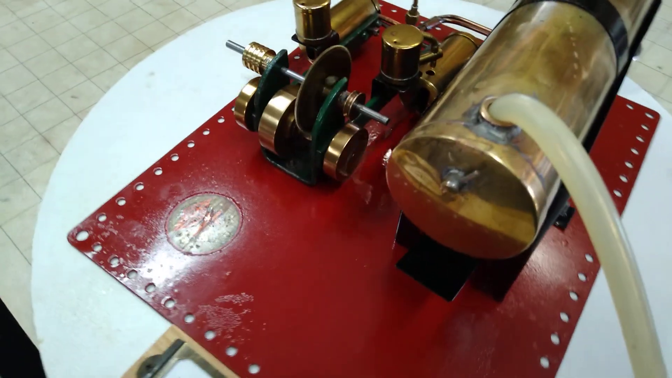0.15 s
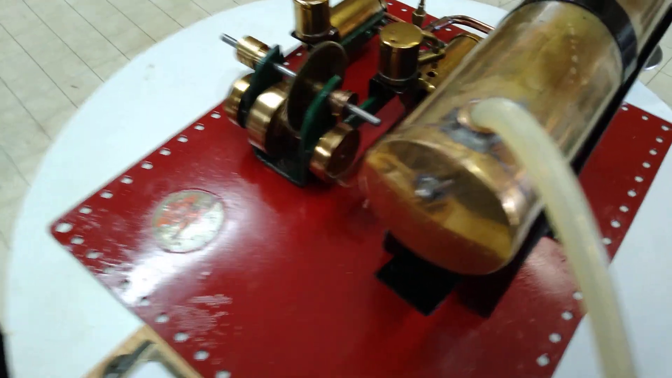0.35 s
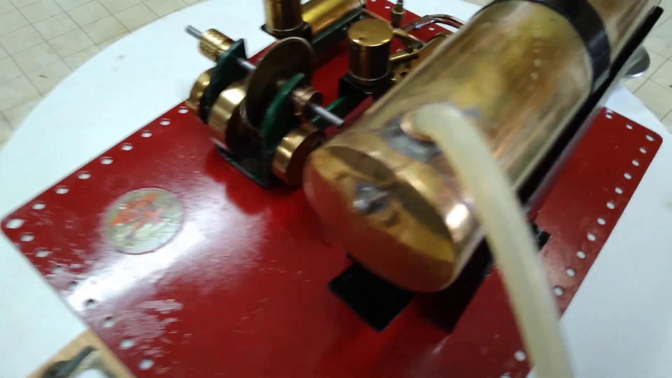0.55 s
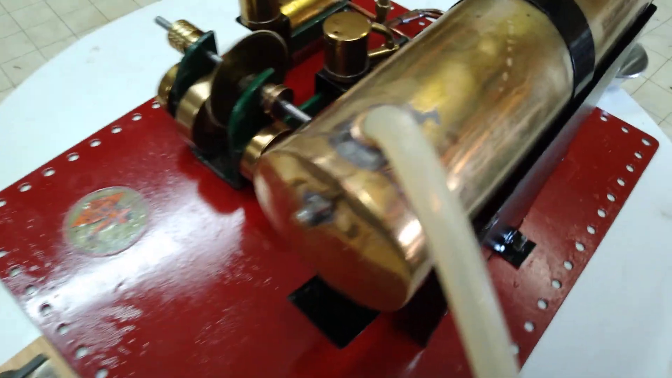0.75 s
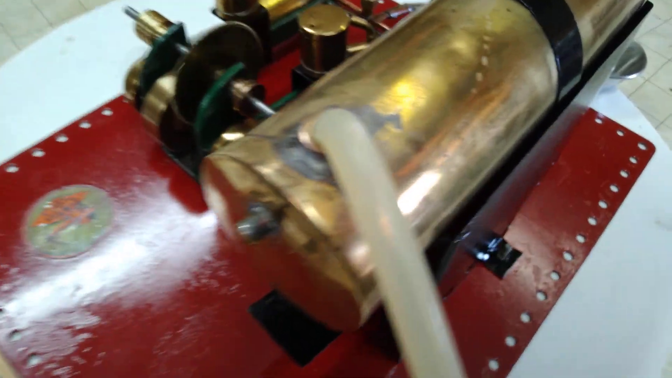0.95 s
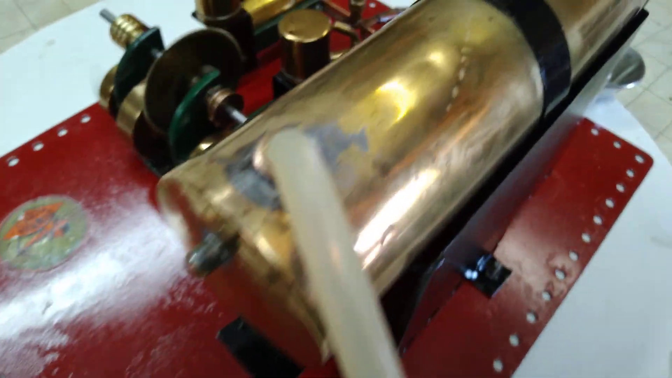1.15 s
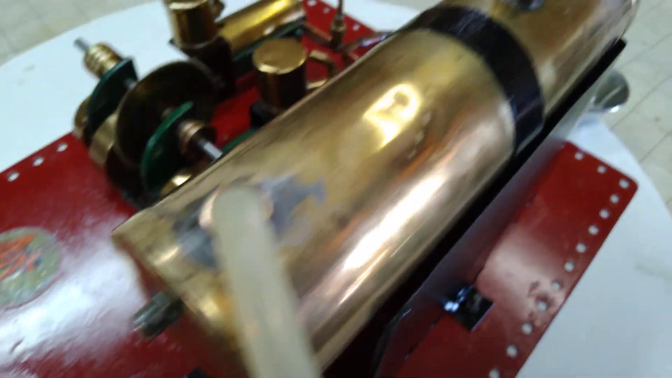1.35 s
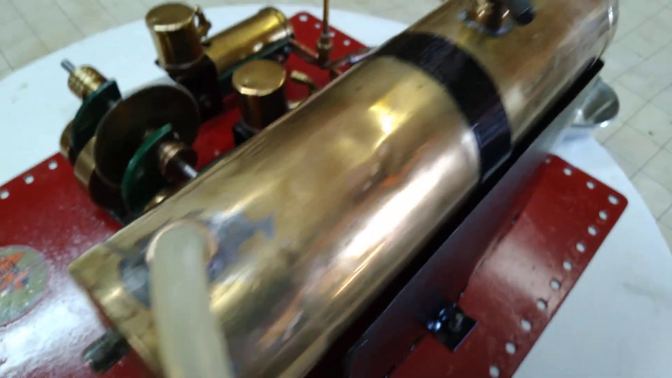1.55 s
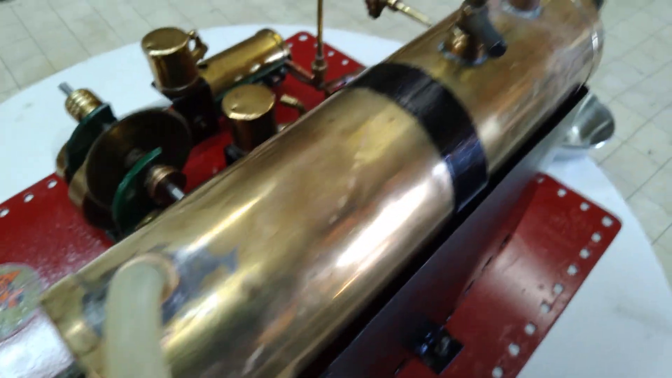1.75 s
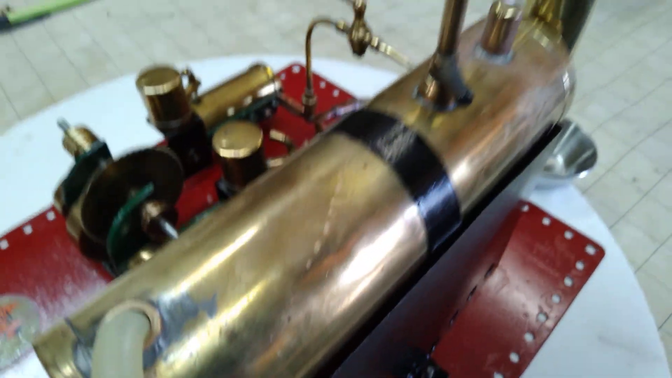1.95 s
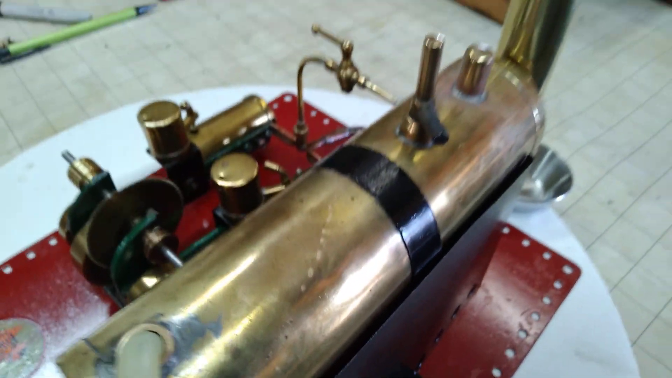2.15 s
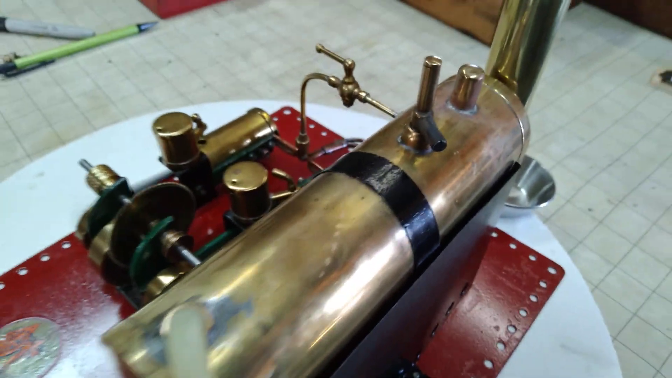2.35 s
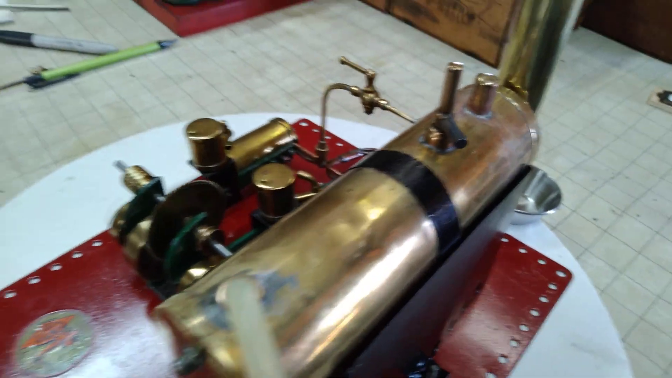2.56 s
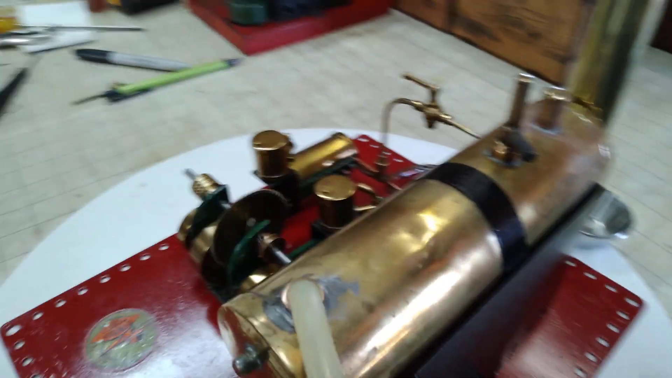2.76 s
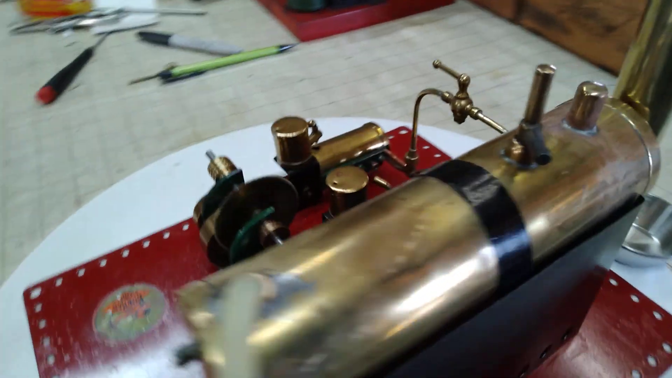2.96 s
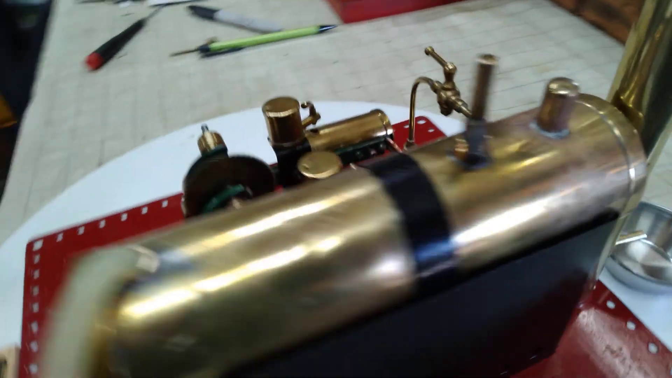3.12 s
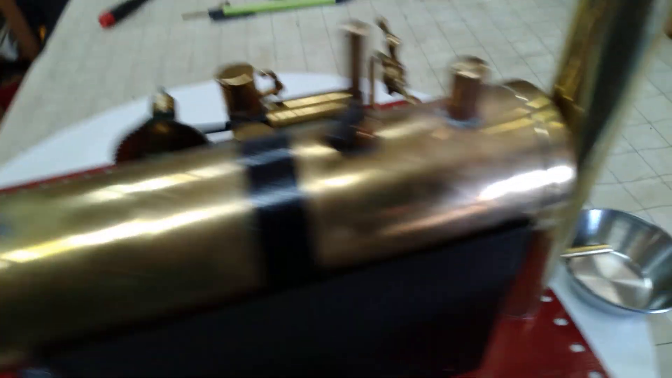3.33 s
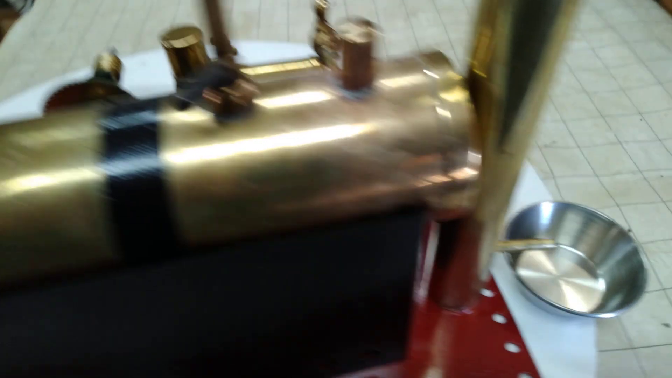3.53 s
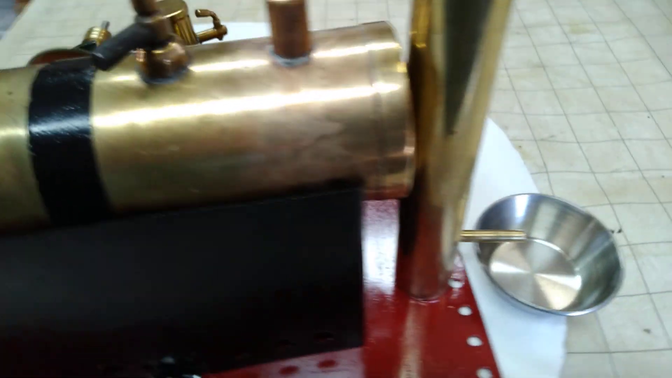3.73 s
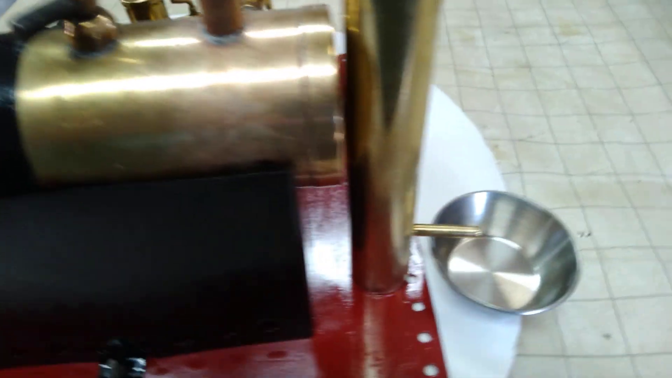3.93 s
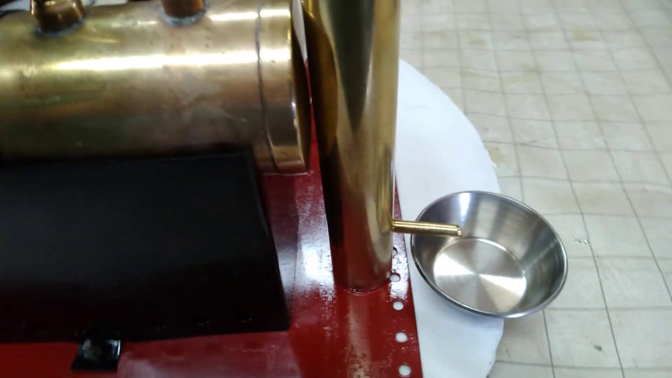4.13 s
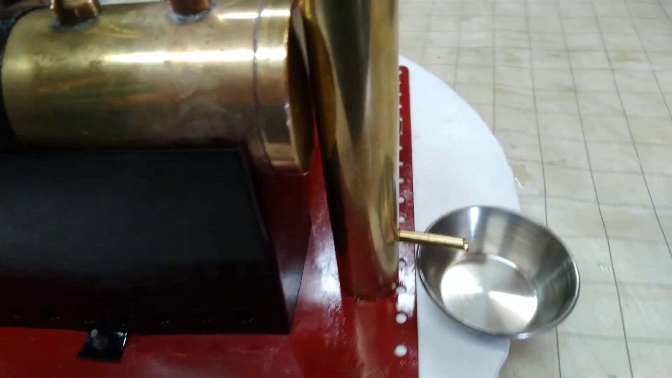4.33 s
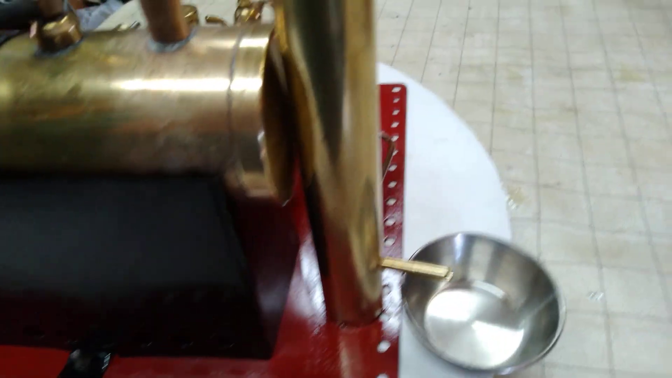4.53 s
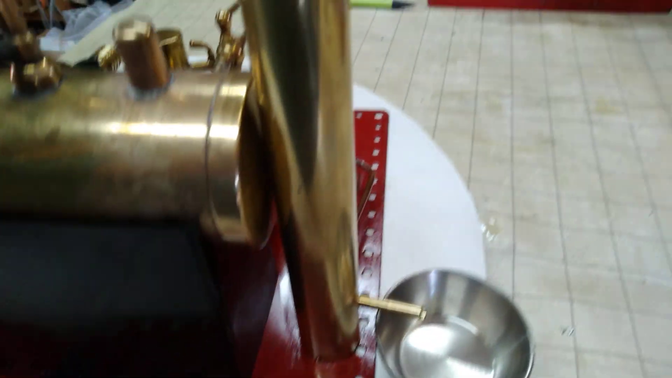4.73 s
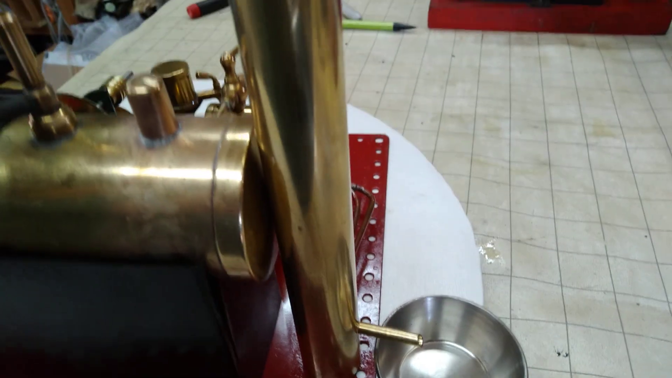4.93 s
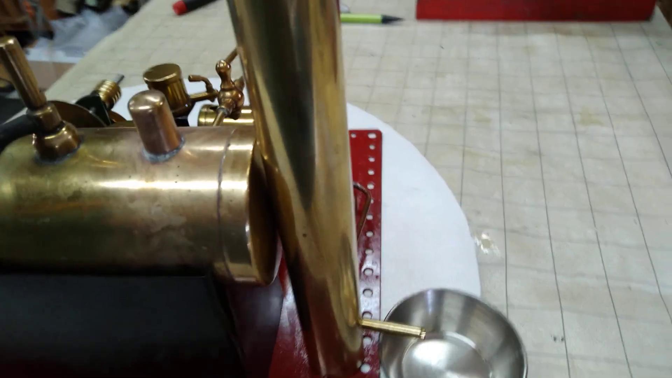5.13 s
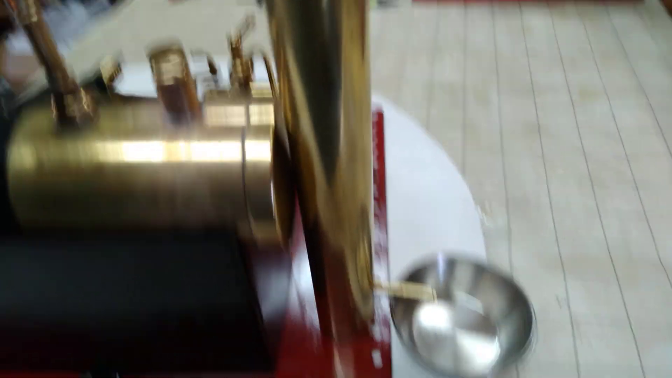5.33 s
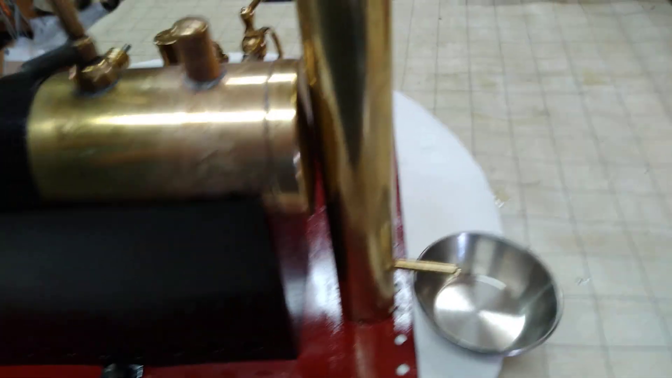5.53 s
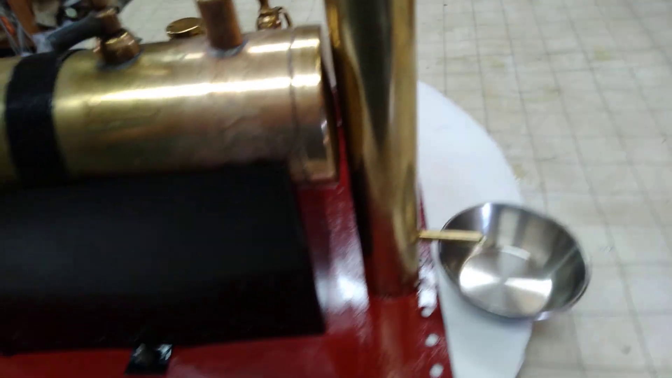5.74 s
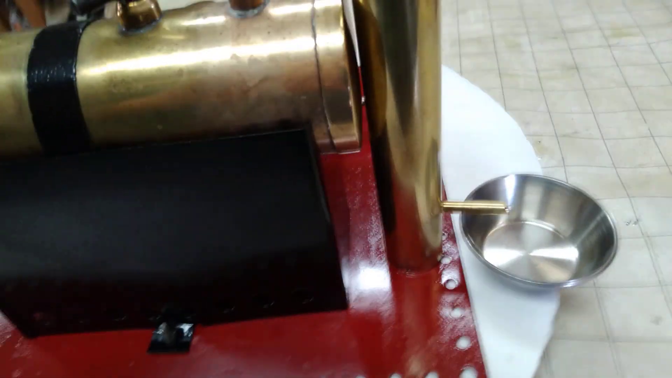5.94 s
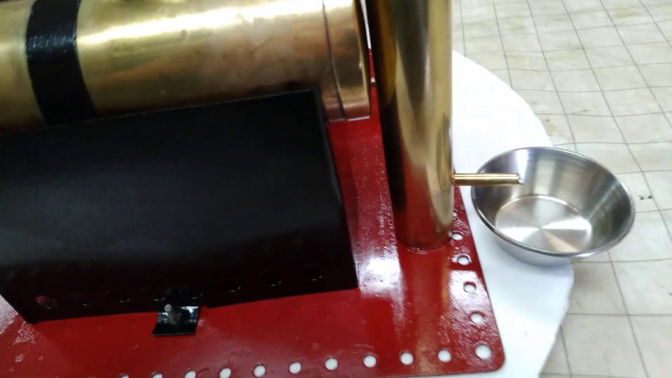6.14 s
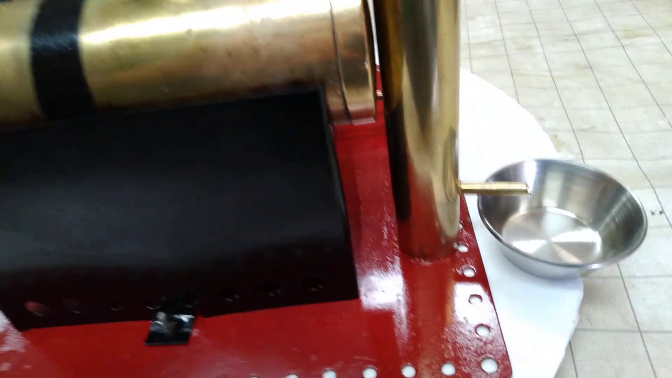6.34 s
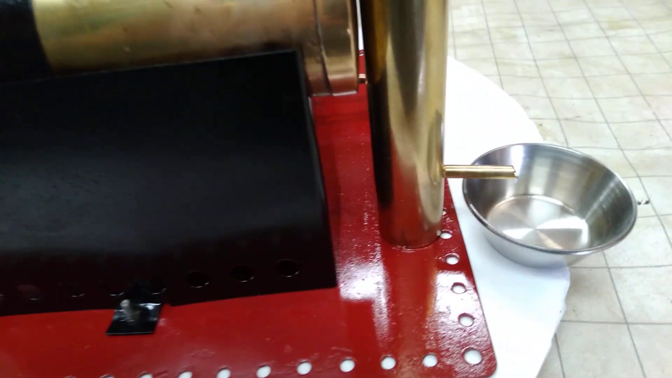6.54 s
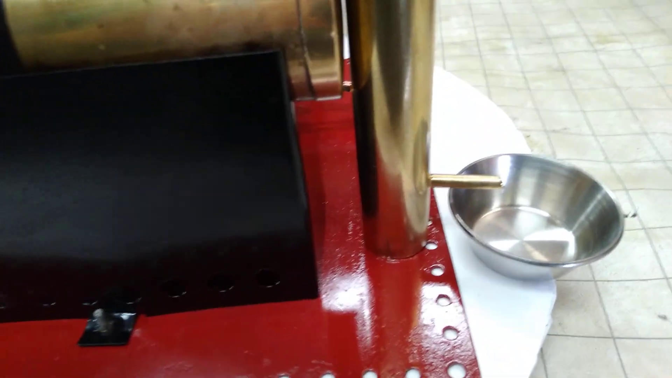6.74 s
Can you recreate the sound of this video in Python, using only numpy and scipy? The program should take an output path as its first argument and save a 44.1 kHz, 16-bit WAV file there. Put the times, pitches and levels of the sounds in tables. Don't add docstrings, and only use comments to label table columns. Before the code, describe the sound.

A small brass model engine on compressed air rattles fast and evenly, metallic clatter over airy hiss and puffs, growing duller behind its boiler.

```python
import sys
import numpy as np
from scipy import signal
from scipy.fft import rfft, irfft, next_fast_len
from scipy.io import wavfile

SR = 44100
rng = np.random.default_rng(int(sys.argv[2]) if len(sys.argv) > 2 else 0)


def amp(db):
    return 10 ** (np.asarray(db, float) / 20)


def write(x):
    x = np.atleast_2d(x).T
    wavfile.write(sys.argv[1], SR, np.round(np.clip(x, -1, 1) * 32767).astype(np.int16))


N = 298998
LAG = 9


def curves(table):
    s, *columns = np.transpose(table)
    return [np.interp(np.arange(N) / SR, s, c) for c in columns]


def unit(x):
    return x / np.sqrt(np.mean(x ** 2))


def ring(x, hz, width_hz):
    return signal.lfilter(*signal.iirpeak(hz, hz / width_hz, fs=SR), x)


def body(x, modes):
    total = np.zeros(N)
    for k, (hz, width_hz, db) in enumerate(modes):
        total += (-1) ** k * amp(db) * ring(x, hz, width_hz)
    return unit(total)


def colour(x, points):
    hz, db = np.transpose(points)
    size = next_fast_len(N)
    bins = np.log(np.arange(size // 2 + 1) * SR / size + 1)
    gain = amp(np.interp(bins, np.log(hz), db))
    return irfft(rfft(x, size) * gain, size)[:N]


def strikes(s, sizes, rise_ms, decay_ms):
    at, x = np.round(s * SR).astype(int), np.zeros(N)
    inside = (at >= 0) & (at < N)
    x[at[inside]] = sizes[inside]
    ms = np.arange(2048) * 1000 / SR
    shape = (1 - np.exp(-ms / max(rise_ms, .02))) ** 2 * np.exp(-ms / max(decay_ms, .1))
    return signal.oaconvolve(x, shape / shape.max())[:N]


def scatter(x, decay_ms, count):
    tail = rng.standard_normal(count) * np.exp(-np.arange(count) * 1000 / SR / decay_ms)
    return signal.oaconvolve(x, tail / np.sqrt(np.sum(tail ** 2)))[:N]


def moving(x, decay_ms, count=5):
    place = np.arange(N) * (count - 1) / N
    total = np.zeros(N)
    for k in range(count):
        share = np.sqrt(np.clip(1 - abs(place - k), 0, 1))
        total += scatter(x * share, decay_ms, count=384)
    return total


def grit(spread_db):
    return unit(rng.standard_normal(N) * amp(spread_db * np.minimum(rng.exponential(size=N), 4)))


def late(x, ms):
    return np.roll(x, int(ms * SR / 1000))


def ports(x, lagged, pan_db):
    return np.array([lagged * amp(pan_db / 2), x * amp(-pan_db / 2)])


def band_changes(x, table):
    x = x.copy()
    fade_s = .15
    for start, end, hz, width_hz, db in table:
        at = np.arange(max(int(start * SR), 0), min(int(end * SR), N))
        fade = np.clip(np.minimum(at / SR - start, end - at / SR) / fade_s, 0, 1)
        x[..., at] += (amp(db) - 1) * fade * ring(x[..., at], hz, width_hz)
    return x


# t/s, turns done
SHAFT = [(.0016, 0), (.7457, 10), (1.3435, 18), (2.0129, 27), (2.6056, 35), (3.0455, 41), (3.9385, 53),
         (4.533, 61), (5.341, 72), (6.0046, 81), (6.736, 91)]


def turns():
    s, done = np.transpose(SHAFT)
    return np.interp(np.arange(done[-1] + 1), done, s)


# t/s, left port turned to the works [0-1], works hidden by the boiler [0-1],
# chimney passed [0-1]
PHONE_PATH = [
    (0, 0.55, 0.05, 0.29),
    (.7, 0.67, 0.14, 0.17),
    (1.05, 0.35, 0.14, 0.07),
    (2.6, 0.11, 0.05, 0.26),
    (3.3, 0.1, 0.37, 0.45),
    (4.3, 0.21, 0.64, 0.34),
    (5.75, 0.24, 0.58, 0.45),
    (5.95, 0.61, 0.51, 0.65),
    (6.78, 0.76, 0.5, 0.76),
]


def position():
    return np.clip(curves(PHONE_PATH), 0, 1)


def placed(rule):
    return rule[0] + np.dot(rule[1:], position())


def floor_noise():
    return amp(-72) * signal.lfilter([1], [1, -.95], rng.standard_normal((2, N)))


def room(treble, bass):
    t60_s = 0.098
    decay_ms = 1000 * t60_s / np.log(1000)
    alike = scatter(bass.mean(axis=0), decay_ms, count=16384)
    apart = np.array([scatter(port, decay_ms, count=16384) for port in treble])
    return amp(-18) * alike + amp(-20) * apart


# t/s, share cancelled [0-1]
BOUNCE = [
    (0, 0.14),
    (1.2, 0.1),
    (2.4, 0.62),
    (3.0, 0.94),
    (4.2, 0.68),
    (4.6, 0.01),
    (5.4, 0.4),
    (6.0, 0.8),
    (6.78, 0.6),
]


def table_bounce(x):
    return x - np.clip(curves(BOUNCE)[0], 0, 1) * ring(x, 2148, 1990)


# time from the crank knock [ms], puff level/dB,
# thump strength, push length [ms]
BEATS = [
    (-29.5, -1, 0.85, 0.47),
    (-11, -2, -0.41, 0.38),
    (1.03, -0.5, 0.61, 0.22),
    (27, -1, 0.53, 0.28),
]
# t/s, level/dB
THUMP = [
    (0, -56.5),
    (.8, -53),
    (2.2, -52.5),
    (2.8, -56),
    (3.2, -52),
    (4.8, -55),
    (5.27, -59),
    (5.7, -55.5),
    (6.12, -62),
    (6.78, -61),
]
# f/Hz, width [Hz], level/dB
PLATE_DEEP = [(70, 69, 1.5), (99.7, 12.6, 5.3)]
PLATE_UPPER = [(143, 51, -1), (169.2, 10, 4), (217, 7.8, 0.5)]
# value in plain sight, change facing, when hidden, past the chimney [all dB]
DEEP_THUMP_DB = (-4, 6, 3.5, 0)
THUMP_PAN_DB = (5.5, 0.5, -23.5, 0)
PIN_LEVEL_DB = (-50, 12, -2.5, -13)


def plate():
    s = turns()
    push = np.zeros(N)
    for ms, _, size, push_ms in BEATS:
        push += strikes(s + ms / 1000, np.full(len(s), size), 0.18, push_ms)
    push = unit(push) + .13 * rng.standard_normal(N)
    upper_db = curves(THUMP)[0]
    deep = body(ring(late(push, 9.1), 100, 100), PLATE_DEEP)
    upper = body(late(push, 16.16), PLATE_UPPER)
    thump = amp(upper_db + placed(DEEP_THUMP_DB)) * deep + amp(upper_db) * upper
    tap = strikes(s - .03, amp(1.5 * rng.standard_normal(len(s))), .03, .1)
    tap = tap + .1 * rng.standard_normal(N)
    pin_hz = 2343
    pin = amp(placed(PIN_LEVEL_DB)) * unit(ring(ring(tap, pin_hz, 350), pin_hz, 55))
    return ports(thump, np.roll(thump, LAG), placed(THUMP_PAN_DB)) + pin * np.array([[.4], [1]])


PUFF_LATE_MS = [0.32, -3, 2.5, -4.5]


def puffs():
    s = turns()
    chance = amp(0.5 * rng.standard_normal((len(s), 4)))
    puff, click = np.zeros(N), np.zeros(N)
    for k, (ms, db, _, _) in enumerate(BEATS):
        when, size = s + (ms + PUFF_LATE_MS[k]) / 1000, amp(db) * chance[:, k]
        puff += strikes(when, size, 0.27, 19)
        click += strikes(when, size, 0.017, 0.033)
    steady_flow = amp(-4)
    air = unit((puff + steady_flow) * rng.standard_normal((2, N)))
    return air, unit(click)


# t/s, level/dB
EXHAUST = [
    (0, -32),
    (.8, -33.5),
    (1.3, -32),
    (3.6, -31.5),
    (4.25, -37.5),
    (5.3, -37),
    (5.7, -36),
    (6.0, -46),
    (6.78, -49),
]
# f/Hz, width [Hz], level/dB
CHIMNEY = [(810, 69, 2), (907, 75.5, 9.5), (985, 17, 5), (1027, 36, 6.5), (750, 228, -2.5), (1040, 72, -3)]
CHIMNEY_HIDDEN = [(818, 93, 8), (921, 120, 9), (1002, 88, 5), (606, 460, -11.5)]
CHIMNEY_PASSED = [(1054.6, 74, -11.5), (793, 12, -15.5)]
# f/Hz, width [Hz], level/dB
CHIMNEY_LOW = [(452.4, 50, 5), (365, 47, -3.5), (330, 1100, -21.5), (515, 110, -13)]
CHIMNEY_UP = [(1260, 78, 1.5), (1468, 66, 7), (1522, 500, -3), (2116, 66, -9)]
CHIMNEY_UP_PASSED = [(1479, 38, 14), (1315, 62, 3), (1855, 370, 1)]
# f/Hz, width [Hz], level/dB
FIREBOX = [(370, 52, 4.5), (232, 45, -1)]
# value in plain sight, change facing, when hidden, past the chimney [all dB]
LOW_RING_DB = (-15, 10.5, 9, -9.5)
UPPER_RINGS_DB = (-13, 12.5, -10.5, 25.5)
CHIMNEY_PAN_DB = (0, -3, 3.5, -0.5)
LOW_PAN_DB = (-11, 10, 9.5, -0.5)
UPPER_PAN_DB = (3, -1.5, -14.5, -0.5)


def exhaust():
    air, click = puffs()
    blow = air[0] + amp(-13) * click
    facing, hidden, passed = position()
    before = (1 - hidden) * body(blow, CHIMNEY) + 0.93 * hidden * body(blow, CHIMNEY_HIDDEN)
    main = (1 - passed) * before + passed * body(blow, CHIMNEY_PASSED)
    low = body(air[0] + .4 * click, CHIMNEY_LOW)
    boom = body(.5 * air[0] + 0.25 * click, FIREBOX)
    low = low + (0.021 + 0.99 * facing + 0.029 * passed) * boom
    upper = []
    for source in (blow, air[1] + 0.014 * blow):
        source = late(source, 4)
        upper.append((1 - passed) * body(source, CHIMNEY_UP) + passed * body(source, CHIMNEY_UP_PASSED))
    out = ports(main, np.roll(main, LAG), placed(CHIMNEY_PAN_DB))
    out = out + amp(placed(LOW_RING_DB) - 1.0) * ports(low, np.roll(low, LAG), placed(LOW_PAN_DB))
    out = out + amp(placed(UPPER_RINGS_DB)) * ports(*upper, placed(UPPER_PAN_DB))
    return amp(curves(EXHAUST)[0]) * out


# value in plain sight, change facing, when hidden, past the chimney [all dB]
LEAK_DB = (-25.5, -1.5, 7, -1.5)
SPUTTER_MS = [11, 18, -14, -39]


def leak(s, shift_ms, softer, works_db):
    opening = 0.24 + strikes(s + 0.0107, np.ones(len(s)), 9.7, 3.3)
    opening += strikes(s - 0.042, np.ones(len(s)), 9.7, 8.0)
    for k, at_ms in enumerate(SPUTTER_MS):
        when = s + (at_ms + 3 * shift_ms[:, k]) / 1000
        opening += .7 * strikes(when, np.minimum(softer[:, k], 3), 1.2, 1.6)
    return amp(works_db + placed(LEAK_DB) - 0.5) * unit(opening)


# t/s, level/dB
SLAPS = [(0.127, -16), (0.277, -15), (0.349, -19), (0.426, -16), (0.501, -16), (0.575, -17), (0.649, -14),
         (.798, -13), (0.873, -19), (0.948, -15), (1.246, -15), (1.393, -13.5), (1.545, -32), (1.914, -18),
         (1.99, -29), (2.287, -17), (2.362, -20), (2.435, -24), (2.509, -19), (2.731, -29), (2.804, -41),
         (2.877, -38), (2.951, -17), (3.171, -18), (3.472, -23), (3.545, -24), (3.619, -28), (5.098, -35),
         (5.98, -28), (6.016, -27), (6.162, -36), (6.195, -31.5), (6.219, -41), (6.267, -40), (6.338, -35),
         (6.382, -38), (6.391, -23.5), (6.421, -31), (6.493, -31)]
# t/s, level/dB
TICKS = [(0.029, -6), (0.061, -18), (0.698, -13), (0.789, -30), (0.873, -16), (1.032, -17), (1.113, -24),
         (1.131, -19), (1.188, -24), (1.279, -15), (1.46, -18.5), (1.482, -30), (1.703, -19), (1.887, -29),
         (1.917, -17), (1.962, -14), (2.001, -25), (2.056, -26), (2.361, -14), (2.366, -22), (2.373, -34),
         (2.435, -18), (2.583, -21), (2.674, -20), (2.888, -30), (3.224, -18), (3.442, -20), (3.585, -25),
         (3.778, -28), (3.923, -28), (4.084, -28), (4.192, -24), (4.249, -18), (4.564, -34), (4.626, -36),
         (4.659, -36), (4.71, -29), (4.801, -25), (5.004, -33), (5.02, -23.5), (5.056, -27), (5.33, -31),
         (5.614, -31), (5.924, -30), (6.088, -33), (6.144, -32), (6.162, -31), (6.21, -35), (6.29, -39),
         (6.38, -32), (6.418, -31), (6.47, -40), (6.509, -32), (6.54, -35), (6.567, -30), (6.613, -33),
         (6.64, -35), (6.724, -41)]


def loose_parts(rod_trim_db):
    slap_s, slap_db = np.transpose(SLAPS)
    tick_s, tick_db = np.transpose(TICKS)
    slaps = strikes(slap_s, amp(slap_db + 9 + rod_trim_db), 0.2, 1.8)
    spikes = amp(2.5) * strikes(slap_s, amp(slap_db), 0.051, 0.21)
    return slaps + spikes + strikes(tick_s, amp(tick_db + 2.5), 0.3, 1.8)


# level in sight/dB, change when hidden/dB,
# change past the chimney/dB, scatter/dB
STRENGTH = [
    (0, 0, 0, .3),
    (-9, -11, 14, 2.5),
    (2.5, -1, -5, .8),
    (4, -7, -3, 1.5),
    (-17, 2, 5, 3),
]
# t/s, change of level/dB
KNOCKS = [(0.225, 0.5), (.895, 0), (.97, 1.5), (1.045, 0.5), (1.12, 0.5), (1.418, 1), (1.567, 1.5),
          (1.641, 1), (1.79, -1), (1.939, 1.5), (2.457, 0.5), (2.606, 0), (2.752, 1), (2.972, -1),
          (3.046, 2), (3.343, -1.5), (3.492, 1.5), (3.938, 1), (4.013, -1), (4.087, -2), (4.161, 1.5),
          (4.236, 1.5), (4.31, 2.5), (4.68, -1.4), (5.121, -1), (5.341, -2), (6.005, 1), (6.297, -3.5),
          (6.37, -2), (6.517, 2)]
# t/s, change of level/dB
PLAY = [(0, 0), (1.05, 2), (1.25, 6), (1.7, -5), (2.1, -8), (2.5, 0), (3.6, 5), (4.1, 1), (4.5, 1),
        (4.95, -6), (5.3, -2), (5.9, 6.5), (6.3, 4), (6.78, 2.5)]
# t/s, change of level/dB
LANDINGS = [(0.103, -1.5), (0.177, 2.5), (0.624, 1.5), (0.698, 1), (0.922, -3), (1.146, 2), (1.221, 2.5),
            (1.296, 5), (1.445, -5), (1.519, -1), (1.594, 1.5), (1.668, -7), (1.742, 3), (2.04, -10),
            (2.188, 1), (2.262, -2.5), (2.559, 1.5), (2.633, -9), (2.706, -11), (2.779, -8), (2.853, -7),
            (2.926, -4), (2.999, 0), (3.668, 3.5), (3.891, 4), (3.966, 5), (4.114, 0.5), (4.188, -4),
            (4.263, -3), (4.633, 3), (4.854, 5), (5.148, 5.5), (5.368, 5), (5.442, 1), (5.589, -5),
            (5.737, -3), (5.81, -4), (6.105, -2), (6.178, 5), (6.251, -3), (6.324, -6), (6.397, -4),
            (6.47, -7), (6.544, 0)]
# t/s, change of level/dB
CATCHES = [(0.225, 4), (0.374, 3), (0.448, -2.7), (0.671, 0), (0.746, -4), (0.895, -1.8), (1.269, 1),
           (1.567, 4.5), (2.235, -1), (2.309, -2.0), (2.606, 3), (2.752, -5), (2.826, -2.0), (2.972, 3.6),
           (3.046, 1.8), (3.343, 0), (3.418, -7), (3.938, 5.5), (4.236, -6), (4.459, 3), (4.533, -3.7),
           (4.606, 1.7), (4.68, 4), (4.753, -1.3), (5.121, 0), (5.488, -1.1), (5.562, -2), (5.636, 3),
           (5.783, 5), (5.857, 1), (6.005, 1.3), (6.151, 0), (6.224, 1.1), (6.297, -1.7), (6.443, 8),
           (6.736, -1)]


def contact_levels(s, softer, works_db):
    at = (s * SR).astype(int)
    _, hidden, passed = position()
    db = []
    for k, (seen, hid, past, spread) in enumerate(STRENGTH):
        db.append(works_db[at] + seen + hid * hidden[at] + past * passed[at] - spread * softer[:, k])
    for k, table, allowance_s in ((2, LANDINGS, 0), (0, KNOCKS, .03), (3, CATCHES, .03)):
        when, change_db = np.transpose(table)
        db[k][np.searchsorted(s, when + allowance_s) - 1] += change_db
    db[1] += curves(PLAY)[0][at]
    return db


# f/Hz, level/dB by the crank knock, by the other contacts, by the leak
WORKS_RINGS = [(3048, -3.5, -41, 6), (4980, -19.5, -49, -3.5), (6200, -55, -12, 2.5), (7074, 11, -34, 9),
               (8100, -42, -9.5, -20), (8969, 12, 7, 10), (9750, -46, 6.5, -5), (11016, 7, 4, 5),
               (13400, -33, 3.5, -4), (15200, -6, -13, -12)]
WORKS_WIDTH_HZ = [300, 400, 300, 150, 500, 230, 340, 270, 500, 600]


def metal(drive):
    rough = drive * np.array([grit(1.6) for _ in drive])
    rung = amp(-8) * (rough[0] + rough[1] + amp(1) * rough[2])
    for (hz, *db), width_hz in zip(WORKS_RINGS, WORKS_WIDTH_HZ):
        rung = rung + ring(amp(np.array(db)) @ rough, hz, width_hz)
    return amp(3.0) * (rung + .3 * moving(rung, 9))


def around_boiler(sharp):
    window = np.hanning(int(2 * 7.5 * SR / 1000))
    blurred = np.sqrt(np.abs(signal.fftconvolve(sharp ** 2, [window / window.sum()], "same")))
    return np.roll(blurred, len(window) // 12, axis=1)


# f/Hz, level/dB
RIGHT_SEEN = [(1500, -17.5), (2500, -8), (3200, 0), (3800, 2.5), (5000, -7.5), (6500, -2.5), (8000, 2),
              (10000, -1), (12500, -4), (14500, 0.5), (16000, 0.5)]
RIGHT_HIDDEN = [(1500, 4.5), (2500, 5.5), (3100, -17), (3800, 10), (4400, -1.5), (5500, 11), (6500, -3),
                (7600, 3), (8300, -14.5), (9200, -4.5), (10000, -5), (10400, 2.5), (11000, 3.5),
                (12000, 9.5), (13500, -3.5), (14400, -4), (15000, -10), (15700, 7)]


def right_port(sharp, blurred):
    hidden = position()[1]
    x = metal((1 - 1.07 * hidden) * sharp + 1.07 * hidden * blurred)
    return (1 - hidden) * colour(x, RIGHT_SEEN) + hidden * colour(x, RIGHT_HIDDEN)


# f/Hz, level/dB
LEFT_FACING = [(1500, 17.7), (2500, 9.9), (4000, 27), (6400, 22), (7100, 20), (7700, 31), (8400, 22),
               (9200, 2.4), (10400, 20), (12000, 12), (13200, 4), (14000, 19), (15500, 24)]
LEFT_SEEN = [(1500, -27), (2550, -37), (3300, 20), (4800, 11), (5500, -12), (6300, 14), (7200, 1),
             (7900, -16), (8400, -3), (9000, -7), (9700, -14), (10400, 0), (11000, -0.5), (11700, 2),
             (12400, -12), (13200, 0), (14000, -2), (15400, 4), (16500, 0)]
LEFT_HIDDEN = [(1500, -20), (2450, 7), (3000, -1), (3800, 29.5), (4800, 5.5), (5500, 13.5), (5900, 17),
               (6400, -15), (7200, 13), (8000, 11.5), (9000, -3), (10000, -17), (10500, -5), (11000, -32),
               (11900, -7), (12600, -1), (13600, 8), (14200, 11), (15400, 15.5), (16500, -25)]


def left_port(sharp, blurred):
    facing, hidden, _ = position()
    x = metal((0.75 * sharp + 0.5 * blurred) * np.array([[.65], [1], [1]]))
    turned_away = .2
    facing = np.clip((facing - turned_away) / (1 - turned_away), 0, 1)
    seen = facing * colour(x, LEFT_FACING) + (1 - facing) * colour(x, LEFT_SEEN)
    return (1 - hidden) * seen + hidden * colour(x, LEFT_HIDDEN)


# from t/s, to t/s, f/Hz, width [Hz]
BAND_DIPS = [
    (-.2, 0.56, 3980, 490),
    (.5, 4.8, 3684, 407),
    (2.6, 2.9, 7074, 600),
    (2.8, 3.9, 5360, 570),
    (3.7, 5.9, 4430, 460),
    (5.8, 12.8, 4730, 734),
]


def dipped(x):
    x = band_changes(x, [(*row, -40) for row in BAND_DIPS])
    return band_changes(x, [(*row, -5) for row in BAND_DIPS])


# t/s, level of the works/dB, treble left minus right/dB
VIEW = [(0, -5, -22.5), (.6, -4.5, -24), (1.3, -5.5, -19.5), (2.0, -2.5, -19), (2.55, -6.5, -16.5),
        (2.78, -7, -16.5), (3.05, -7, -16.5), (3.2, -12.5, -9.5), (3.9, -12.5, -11), (4.4, -18, -6.5),
        (5.15, -18.5, -9), (5.6, -15, -11), (6.15, -23, -9), (6.78, -23, -12)]
# rise [ms], decay [ms], trim level/dB
CONTACTS = [
    (1.2, 2.5, 1),
    (0.3, 1.6, 2),
    (1.6, 2.0, -6.5),
    (2.5, 1.2, -6.5),
    (0.21, 2, -4.5),
]
CONTACT_MS = [-1.0, -6.0, 26.0, -32.0, -22.3]
LOOSE_MS = [.2, .3, .7, .4, .5]
# f/Hz, level/dB
SHADE_LEFT = [(2500, -35), (2900, -9), (3800, -16.5), (5900, 6), (7200, -21), (9000, -24), (10500, 0),
              (11600, -5), (12400, -24), (14000, -9), (15500, -5)]
SHADE_RIGHT = [(2500, -27), (3800, -31), (4600, 1.5), (6000, -7), (7000, -6.5), (8200, -1.5), (9000, 0.5),
               (9600, 7.5), (11000, 1), (12300, -10), (14400, 1), (15500, -10)]
# from t/s, to t/s, f/Hz, width [Hz],
# level/dB
BANDS_LEFT = [(1, 1.6, 20000, 500, -5), (5, 6.1, 10000, 1100, -4), (-2.5, 4.5, 14000, 2800, -12),
              (-1.5, 5.9, 7300, 1600, -7), (3, 4.3, 10300, 900, -13), (1.5, 8.3, 9000, 710, -16),
              (4.5, 5.7, 10900, 500, 7), (5, 8, 12750, 500, 5.5), (4.2, 6.4, 8660, 410, 9.5),
              (4.5, 4.8, 4060, 370, 9.5)]
BANDS_RIGHT = [(-.2, 2.02, 10300, 500, 5.5), (.4, 2.7, 13100, 496, -1), (1.9, 3.2, 4150, 400, -5.5),
               (2.3, 2.9, 9200, 500, 4), (3, 5.6, 14900, 900, 5), (3.1, 4.03, 2870, 600, -8),
               (3.9, 11, 4320, 350, 10), (3.9, 4.8, 5300, 800, -11), (4.2, 4.85, 8900, 347.6, 6.5),
               (4.7, 9.3, 13900, 900, -7), (5.9, 7, 8200, 500, 6.5), (5.9, 6.2, 12400, 905, 3.5),
               (4, 4.26, 11300, 500, 4)]


def works():
    s = turns()
    at = (s * SR).astype(int)
    works_db, pan_db = curves(VIEW)
    _, hidden, passed = position()
    ms = CONTACT_MS + LOOSE_MS * rng.standard_normal((len(s), 5))
    ms[:, 0] += 1.85 * hidden[at]
    softer = rng.exponential(size=(len(s), 5))
    db = contact_levels(s, softer, works_db)
    hits = []
    for k, (rise_ms, decay_ms, trim_db) in enumerate(CONTACTS):
        hits.append(strikes(s + ms[:, k] / 1000, amp(db[k] + trim_db), rise_ms, decay_ms))
    snap = strikes(s + (ms[:, 2] + 1.4) / 1000, amp(db[2] + 5 - 12 * hidden[at]), 0.037, 0.05)
    others = sum(hits[1:]) + snap + loose_parts(CONTACTS[4][2])
    air = leak(s, ms - CONTACT_MS, softer, works_db)
    knock_gain = amp(-5)
    sharp = np.array([knock_gain * hits[0], knock_gain * others, air])
    blurred = around_boiler(sharp)
    right = right_port(sharp, blurred)
    left = amp(pan_db) * left_port(sharp, blurred)
    left = left + amp(pan_db - 9) * np.roll(right, LAG)
    left = (1 - passed) * left + passed * colour(left, SHADE_LEFT)
    right = (1 - passed) * right + passed * colour(right, SHADE_RIGHT)
    click = strikes(s - .0362, amp(works_db[at] - 9.5 - 4.3 * softer[:, 4]), .02, .03)
    valve = ring(click, 4800, 3200)
    left = band_changes(left, BANDS_LEFT) + 0.15 * valve
    right = band_changes(right, BANDS_RIGHT) + valve
    return dipped(np.array([left, right]))


# from t/s, to t/s, f/Hz, width [Hz],
# level/dB
BANDS_LOW = [
    (-0.9, 0.72, 1260, 140, -11),
    (0.5, 2.8, 1740, 250, -11),
    (1.5, 2.23, 235, 37, 4.5),
    (3, 4.9, 1920, 410, -5),
    (5.9, 8.6, 200, 140, -4.5),
    (4, 7, 366, 110, -5),
    (4, 4.6, 1450, 150, 7),
    (3, 5.4, 680, 81, 3.5),
]


def scene():
    treble, bass = table_bounce(works()), table_bounce(exhaust())
    bass = band_changes(bass + plate(), BANDS_LOW)
    return treble + bass + room(treble, bass) + floor_noise()


def gated(x):
    z = signal.stft(x, window="cosine", nperseg=2048, noverlap=1024)[2]
    power = np.abs(z[:, :1024]) ** 2 + 1e-18
    band_db = 10 * np.log10(power.reshape(2, 64, 16, -1).mean(axis=2))
    loudness_db = 10 * np.log10(power.sum(axis=(0, 1)))
    limit_db = -63.5 + .45 * loudness_db + 3.5 * rng.standard_normal(band_db.shape[1:])
    bass = (np.arange(64) < 6)[:, None]
    keep = (band_db > limit_db) | bass
    z[:, :1024] *= np.repeat(keep, 16, axis=1)
    return signal.istft(z, window="cosine", nperseg=2048, noverlap=1024)[1][:, :N]


def band_limit(x):
    return signal.sosfilt(signal.butter(12, 16820, fs=SR, output="sos"), x)


def record(dry):
    rounded = np.tanh(dry)
    cut = signal.sosfilt(signal.butter(5, 56, "high", fs=SR, output="sos"), rounded)
    cut = signal.sosfilt(signal.ellip(8, .5, 48, 15780, fs=SR, output="sos"), cut)
    mix = np.clip(gated(cut), -1, 1)
    return band_limit(mix)


dry = scene()
out = record(dry)
write(out)
```